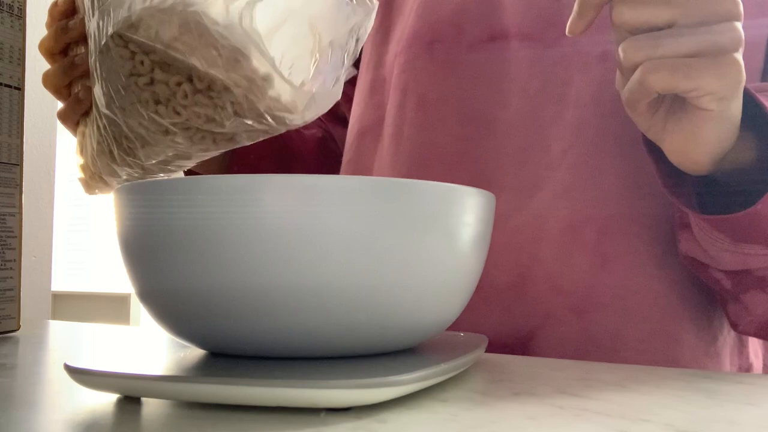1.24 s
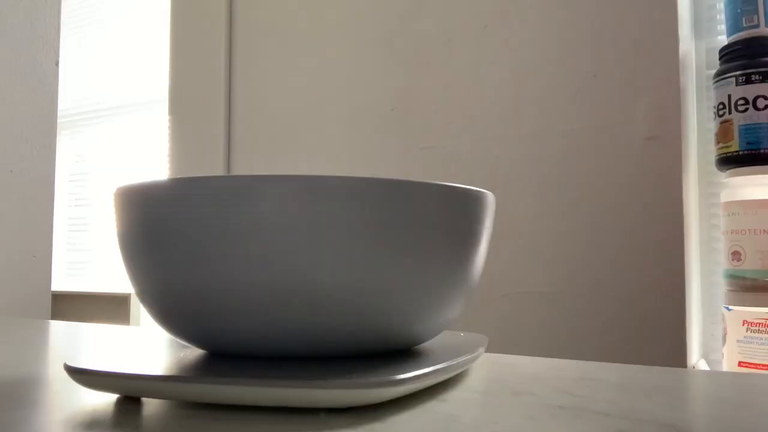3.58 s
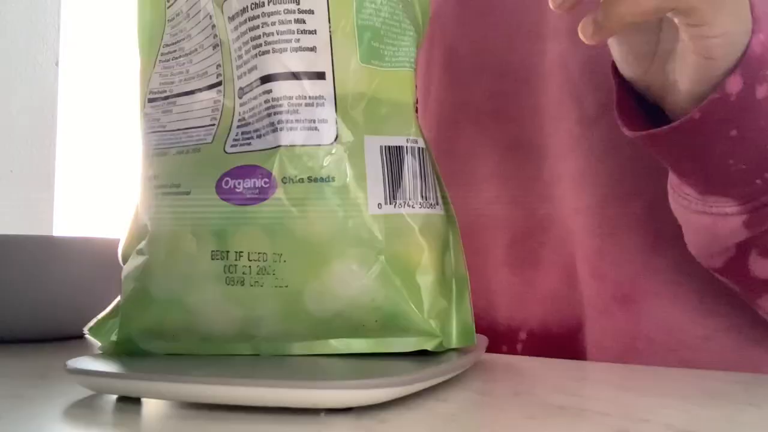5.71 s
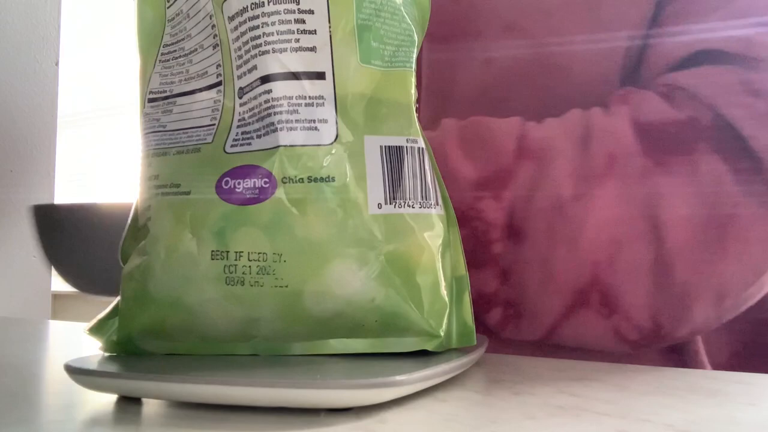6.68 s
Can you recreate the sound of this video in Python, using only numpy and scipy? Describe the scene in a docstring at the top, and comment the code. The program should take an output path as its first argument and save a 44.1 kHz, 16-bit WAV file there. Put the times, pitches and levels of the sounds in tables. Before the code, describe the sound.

Heard up close on the counter of a small, softly humming kitchen, a thin plastic liner crackles as cereal flakes slide out and rattle brightly into a bowl. When the pouring stops, a stiff pouch rustles and drops onto a scale with three dull knocks, then crinkles in sharp snaps that thin out. Near the end come a soft bump with a short scuff and a faint swish of a sleeve.

```python
"""Fingers tick on a thin plastic liner over the quiet hum of a small kitchen. Cereal slides out of it
and patters in gushes into a bowl on a kitchen scale. Then a stiff plastic pouch is picked up, dropped
on the scale with three thumps and crinkled by hand, its folds buckling in snaps. A soft bump, a scuff
and the brush of a sleeve follow. A close-set stereo pair stands right beside it all on the counter."""
import sys
import numpy as np
from scipy import signal
from scipy.fft import rfft, irfft, next_fast_len
from scipy.io import wavfile

SR = 44100
rng = np.random.default_rng(int(sys.argv[2]) if len(sys.argv) > 2 else 0)


def materialize(psi):
    """Save the field psi as 16-bit PCM at rate SR to the path in sys.argv[1].

    A 1-D psi becomes a single channel; in a 2-D psi each row is a channel.
    """
    bounded = np.clip(np.atleast_2d(psi).T, -1, 1)
    quanta = np.round(bounded * 32767).astype(np.int16)
    wavfile.write(sys.argv[1], SR, quanta)


N = 374401
TIME = np.arange(N) / SR
TAPS, LEAD = 4096, 256  # samples in a filter or snap; samples ahead of a snap's crack
HZ = np.maximum(np.fft.rfftfreq(TAPS, 1 / SR), 1)

# spectrum of a dry tick, from flake or liner: frequency_hz, level_db
TICK_COLOUR = [(300, -39.5), (1000, -5.5), (2000, -4.5), (5000, -4), (9000, 0), (16000, -5.5)]
# hollow of the bowl: pitch_hz, width_hz, boost_db
BOWL_RESONANCES = [(960, 130, 6), (1600, 170, 5), (2060, 260, 11), (2440, 70, 6), (3150, 260, 9.5),
                   (3420, 260, 12), (5640, 450, 6), (6700, 300, 5), (8540, 200, 5)]
# spectrum of the stiff pouch film: frequency_hz, level_db
POUCH_COLOUR = [(100, -9.5), (200, 1.5), (370, 4.5), (500, 11.5), (710, -4.5), (850, 5.5), (1200, 3),
                (1850, 4.5), (2600, -4.5), (3400, -1), (4500, -8), (6000, -13.5), (9000, -16.5),
                (16000, -22)]


def from_db(db):
    """Decibels to gain."""
    return 10 ** (np.asarray(db) / 20)


def pan(db):
    """Gains that put the left microphone db above the right."""
    return from_db([[db / 2], [-db / 2]])


def in_time(points):
    """A level curve as a gain at every sample, silent outside its span."""
    times, level_db = np.transpose(points)
    inside = np.clip(np.minimum(TIME - times[0], times[-1] - TIME) / .01, 0, 1)
    return from_db(np.interp(TIME, times, level_db)) * inside


def movement(start, length, db, attack_s, sag_db_per_s, release_db_per_s):
    """Gain of one movement: it swells, drifts while it lasts and then dies away."""
    age = np.maximum(TIME - start, 0)
    fall_db = sag_db_per_s * age + release_db_per_s * np.maximum(age - length, 0)
    return np.minimum(age / attack_s, 1) * from_db(db - np.minimum(fall_db, 100))


def at_hz(points, hz=HZ):
    """Read a table along a log-frequency axis."""
    frequencies, values = np.transpose(points)
    return np.interp(np.log(hz), np.log(frequencies), values)


def around(hz, skirt_db):
    """Broad hump: skirt_db down one octave from its centre."""
    return -skirt_db * np.log2(1 + np.log2(HZ / hz) ** 2)


def resonance(hz, width_hz, boost_db):
    """One narrow peak in a spectrum, in dB."""
    return boost_db / (1 + (2 * (HZ - hz) / width_hz) ** 2)


def boost(modes):
    """Several resonances together, in dB."""
    return sum(resonance(*mode) for mode in modes)


def treble_shelf(db, corner_hz=4200):
    """Raise or lower everything above the corner."""
    return db / (1 + (corner_hz / HZ) ** 4)


def coloured(x, shape_db):
    """Causal (minimum-phase) filter of unit energy with the given response."""
    cepstrum = irfft(shape_db * np.log(10) / 20)
    cepstrum[1:TAPS // 2] *= 2
    cepstrum[TAPS // 2 + 1:] = 0
    response = irfft(np.exp(rfft(cepstrum)))
    return signal.oaconvolve(x, response[None] / np.linalg.norm(response))[:, :x.shape[1]]


def add(out, start_s, sound):
    """Mix a short stereo sound in at start_s."""
    start = max(round(start_s * SR), 0)
    out[:, start:start + sound.shape[1]] += sound[:, :N - start]


def placed(x, lag_ms):
    """Two microphones; a positive lag reaches the left one later."""
    i, half = np.arange(len(x)), lag_ms * SR / 2000
    return np.array([np.interp(i - half, i, x), np.interp(i + half, i, x)])


def held(x, seconds):
    """Scale a short stereo sound to the energy of a full-scale level held for that long."""
    return x * np.sqrt(seconds * SR / (np.sum(x ** 2) / 2))


def dying(energy, decay_ms, rise_ms=0.099):
    """Amplitude of bursts whose energy builds up quickly and leaks away."""
    decay, rise = np.exp(-1000 / (np.array([decay_ms, rise_ms]) * SR))
    stored = signal.lfilter([(1 - decay) * (1 - rise)], [1, -decay - rise, decay * rise], energy + 1e-18)
    return np.sqrt(np.abs(stored))


def cracks(energy, crack_ms, scatter_ms, scatter_db, lag_ms):
    """Each impulse is a sharp direct crack, then a diffuse scatter from the surfaces close by."""
    white = rng.standard_normal((3, len(energy)))
    direct = placed(dying(energy, crack_ms) * white[0], lag_ms)
    scatter = from_db(scatter_db) * dying(energy, scatter_ms) * white[1:]
    return (direct + scatter) / np.hypot(1, from_db(scatter_db))


def grains(per_s, spread_db):
    """Energies of random tiny impacts, many weak and a few strong; mean 1."""
    energy = (rng.random(N) < per_s / SR) / per_s
    hits = np.flatnonzero(energy)
    energy[hits] *= from_db(spread_db * np.minimum(rng.exponential(1, N)[hits], 4)) ** 2
    return energy / energy.mean()


def buckling(before_db, after_db, fade_s):
    """Energy of one snap at sample LEAD: the material creaks before it and settles in smaller snaps."""
    age = (np.arange(TAPS) - LEAD) / SR
    small_snaps = (rng.random(TAPS) < 500 / SR) * rng.exponential(1, TAPS)
    fade = from_db(np.where(age < 0, before_db, after_db)) ** 2 * np.exp(-np.abs(age) / fade_s)
    return signal.unit_impulse(TAPS, LEAD) + small_snaps * fade


def tick(colour):
    """One small hard impact with the given spectrum."""
    energy = buckling(before_db=-25, after_db=-20, fade_s=.006)
    crack = cracks(energy, crack_ms=.34, scatter_ms=2, scatter_db=-8, lag_ms=.055)
    return held(coloured(crack, colour), seconds=.00065)


def diffuse(shape_db):
    """Noise from all around, most alike at the two microphones in the deep bass and high treble."""
    # likeness of left and right: frequency_hz, correlation
    likeness = [(60, 0.84), (150, 0.28), (380, 0.49), (950, -0.39), (2380, -0.033), (5980, 0.79),
                (15000, 0.98)]
    size = next_fast_len(N)
    alike = np.clip(at_hz(likeness, np.maximum(np.fft.rfftfreq(size, 1 / SR), 1)), -.98, .98)
    mid, side = rfft(rng.standard_normal((2, size)))
    pair = irfft(np.sqrt(1 + alike) * mid + np.sqrt(1 - alike) * side * [[1], [-1]])[:, :N]
    return coloured(pair / np.sqrt(2), shape_db)


def appliance_hum():
    """Room tone: the low steady rush of an appliance with a few faint tones and a thin whine."""
    # spectrum of the rush: frequency_hz, level_db
    rush_colour = [(30, -4), (65, -10), (90, -5), (130, 0), (290, -3.5), (420, -15), (500, -13), (660, -21),
                   (900, -24), (1500, -29), (2600, -44), (6000, -55.5), (10000, -54.5), (16000, -60)]
    # resonances in the rush: pitch_hz, width_hz, boost_db
    rush_modes = [(238, 14, 5), (470, 20, 3), (530, 25, 8), (720, 25, 6), (815, 40, 6), (10950, 300, 8)]
    # steady tones: pitch_hz, level_db
    hum_tones = [(118, -74), (140, -64), (178, -65), (236.9, -62.5), (274.5, -74.5), (527.6, -76.5),
                 (721, -92), (818, -79), (1303, -83.5)]
    tones = sum(from_db(db) * np.sqrt(2) * np.sin(2 * np.pi * (hz * TIME + rng.random()))
                for hz, db in hum_tones)
    rush = from_db(-52.5) * diffuse(at_hz(rush_colour) + boost(rush_modes))
    return (rush + tones) * pan(2.4)


def grip():
    """Faint ticks of the thin liner under the fingers before it tips."""
    # fingers shifting: time_s, level_db
    finger_levels = [(0.0, -64), (0.11, -73.5), (0.226, -62.5), (0.35, -79), (0.492, -62), (0.73, -114)]
    energy = grains(per_s=1600, spread_db=4.5) * in_time(finger_levels) ** 2
    ticks = cracks(energy, crack_ms=.74, scatter_ms=1.1, scatter_db=4, lag_ms=0)
    return from_db(6) * coloured(ticks, at_hz(TICK_COLOUR) + treble_shelf(-17.5))


def liner_snaps():
    """Folds of the liner flip over with a dry, pitched tick."""
    # folds flipping: start_s, level_db, pitch_hz, treble_db
    snaps = [(0.145, -45.5, 2280, -19), (0.225, -31.5, 3700, -5), (0.257, -33, 3500, -23),
             (0.3971, -33.5, 1970, -15), (0.479, -34.5, 2300, -27), (0.542, -46.5, 3230, -44),
             (0.6075, -38, 1670, -19.5), (0.7058, -49, 3070, -4.5), (0.8522, -31.5, 1960, -12),
             (0.912, -33, 1590, -27), (0.99, -30, 2100, -24), (1.184, -35, 1590, -6),
             (1.235, -36, 3450, -10), (1.39, -42, 3470, -19), (1.5942, -22.5, 1600, -7),
             (2.597, -21, 2180, -25)]
    out, mean_treble_db = np.zeros((2, N)), np.mean(snaps, axis=0)[-1]
    for start_s, level_db, hz, treble_db in snaps:
        fold = around(hz, skirt_db=5) + resonance(hz, width_hz=320, boost_db=12)
        colour = at_hz(TICK_COLOUR) + fold + treble_shelf(7 + treble_db - mean_treble_db)
        add(out, start_s - LEAD / SR, from_db(level_db) * tick(colour))
    return out


def handling():
    """Dull rumble of hands and sleeves shifting the load."""
    # hand movements: start_s, length_s, level_db
    moves = [(0.376, 0.65, -47.5), (1.334, 2.24, -50), (3.624, 0.25, -45), (4.431, 0.67, -45.5)]
    # spectrum of the rumble: frequency_hz, level_db
    rumble_colour = [(35, -51.5), (60, -21), (140, 5), (204, 4), (237, 1.5), (265, -17), (293, -1),
                     (407, -18.5), (477, -7), (650, -12), (840, -61.5), (1430, -120)]
    effort = sum(movement(*move, attack_s=.046, sag_db_per_s=2, release_db_per_s=48) for move in moves)
    return effort * diffuse(at_hz(rumble_colour))


def cereal_slide():
    """Flakes slide down the tipped liner in a stream of tiny contacts."""
    # flow over the film: time_s, level_db
    slide_levels = [(0.715, -63), (0.76, -51), (0.842, -51), (0.865, -45.5), (0.99, -43), (1.12, -49),
                    (1.26, -50), (1.38, -45), (1.5, -46), (1.72, -46.5), (1.79, -44.5), (2.19, -45.5),
                    (2.57, -60.5), (2.7, -48.5), (3.07, -43.5), (3.47, -59), (3.57, -61.5)]
    # spectrum of flakes on film: frequency_hz, level_db
    slide_colour = [(150, -45), (250, -24), (360, 0), (410, -6), (475, 3.5), (650, -7.5), (875, 1),
                    (1380, -3.5), (1610, 2.5), (2130, -2.5), (2440, -6), (3100, -7), (3430, -1), (3700, -5),
                    (4190, -9.5), (14200, -20), (16000, -35)]
    energy = grains(per_s=1200, spread_db=3.4) * in_time(slide_levels) ** 2
    contacts = cracks(energy, crack_ms=.5, scatter_ms=3.5, scatter_db=1, lag_ms=0)
    return from_db(2.5) * coloured(contacts, at_hz(slide_colour))


def cereal_gushes():
    """Flakes spill in gushes and patter into the bowl while the emptying liner crackles."""
    # spills over the lip: start_s, length_s, patter_db, sag_db_per_s, crackle_db
    gushes = [(0.68, 0.97, -65, -9, -68.5), (1.79, 0.58, -31.5, 9.5, -40), (2.422, 0.063, -36.5, 26, -65),
              (2.615, 0.782, -41.5, 2, -52), (3.502, 0.1, -62, 8, -63)]
    # flakes from big to small: pitch_hz, share_db
    flake_sizes = [(1600, -8.5), (3800, -6), (9000, -6)]
    # spectrum of the patter in the bowl: frequency_hz, level_db
    bowl_colour = [(400, -42), (900, -3.5), (1600, -5.5), (2200, -3), (2700, -5.5), (4300, -6), (6000, -1),
                   (9000, -3.5), (16000, -16.5)]
    # spectrum of the thin liner: frequency_hz, level_db
    liner_colour = [(1500, -31), (4000, -8), (7000, -2), (11000, -1.5), (16000, -5.5)]
    landing = crackle = patter = 0
    for start_s, length_s, patter_db, sag, crackle_db in gushes:
        flow = movement(start_s, length_s, db=0, attack_s=.09, sag_db_per_s=sag, release_db_per_s=193)
        landing += from_db(patter_db) * flow
        crackle += from_db(crackle_db) * flow
    flakes_per_s = 950 * np.maximum(landing / landing.max(), .4)  # a thin flow has fewer flakes
    for hz, share_db in flake_sizes:
        energy = grains(flakes_per_s / len(flake_sizes), spread_db=3.3) * landing ** 2
        hits = cracks(energy, crack_ms=.3, scatter_ms=2, scatter_db=-2.5, lag_ms=.04)
        colour = at_hz(bowl_colour) + boost(BOWL_RESONANCES) + around(hz, skirt_db=4.5)
        patter += from_db(share_db) * coloured(hits, colour)
    film_energy = grains(per_s=450, spread_db=5.2) * crackle ** 2
    film = cracks(film_energy, crack_ms=.15, scatter_ms=3, scatter_db=0, lag_ms=.06)
    return from_db(4.5) * patter + from_db(9.5) * coloured(film, at_hz(liner_colour))


def hard_flakes():
    """The hardest impacts stand out, each with its own pitch and its own mix of the bowl's modes."""
    # flakes hitting the bowl: start_s, level_db, pitch_hz, treble_db
    impacts = [(1.7525, -19.5, 3120, -18.5), (1.7615, -10, 6200, -20.5), (1.784, -11, 5900, -24),
               (1.801, -15, 2170, -21), (1.8045, -11.5, 3360, -17.5), (1.86, -27, 5700, -16),
               (1.877, -18, 3270, -18), (1.9, -19, 3240, -22.5), (1.9121, -9, 5700, -10),
               (1.819, -8, 3380, -16.5), (1.839, -12, 8730, -7), (1.8692, -7.5, 3700, -17),
               (1.889, -15, 3440, -10), (1.9096, -9.5, 5600, -10.5), (1.917, -19, 6660, -12.5),
               (1.9474, -9, 3470, -10), (1.981, -13, 3430, -11), (1.987, -7, 3374, -14),
               (2.0039, -11, 2070, -14.5), (2.0583, -17, 3100, -23), (2.07, -12, 3270, -18.5),
               (2.0773, -9.5, 3130, -27.5), (2.1078, -17, 3450, -13.5), (2.127, -13.5, 3370, -15),
               (2.1709, -10, 3400, -13.5), (2.186, -13.5, 3260, -14), (2.2193, -14, 3360, -20.5),
               (2.3461, -24, 3170, -24.5), (2.367, -17, 3570, -23), (2.417, -26, 5660, -15.5),
               (2.4453, -23, 3230, -10.5), (2.4754, -17.5, 3500, -10.5), (2.4944, -20, 3450, -19),
               (2.5223, -22.5, 2020, -15), (2.5553, -24.5, 2000, -15), (2.617, -25.5, 1930, -27.5),
               (2.6248, -29, 3360, -21), (2.6444, -31, 5620, -15.5), (2.7026, -31, 3100, -25.5),
               (2.7072, -19, 3070, -23.5), (2.7511, -17.5, 6660, -15), (2.8268, -29, 2060, -18.5),
               (2.843, -23, 1570, -15), (2.8696, -21.5, 2100, -27.5), (2.933, -30, 3230, -30),
               (2.952, -32, 1770, -16), (3.025, -24, 3490, -6), (3.047, -16, 3100, -5.5),
               (3.11, -19, 2100, -3.5), (3.1276, -14.5, 8700, -16.5), (3.1613, -24, 3440, -11),
               (3.2422, -20, 1960, -14), (3.2647, -22, 2050, -1.5), (3.3056, -16.5, 6550, -7.5),
               (3.362, -29, 3330, -16.5), (3.371, -23, 3390, -6), (3.3978, -27, 6700, -15),
               (3.4187, -30, 6600, -18.5), (3.468, -24.5, 2060, -19.5), (3.493, -27, 8650, -14),
               (3.5384, -30, 2100, -24.5)]
    out, mean_treble_db = np.zeros((2, N)), np.mean(impacts, axis=0)[-1]
    for start_s, level_db, hz, treble_db in impacts:
        bowl = .65 * sum(rng.uniform(.5, 1.5) * resonance(*mode) for mode in BOWL_RESONANCES)
        flake = around(hz, skirt_db=3.5) + resonance(hz, width_hz=260, boost_db=5.5)
        colour = at_hz(TICK_COLOUR) + bowl + flake + treble_shelf(11.5 + treble_db - mean_treble_db)
        add(out, start_s - LEAD / SR, from_db(level_db) * tick(colour))
    return out


def pouch():
    """Each squeeze rubs and crackles the pouch; after each crease the contents settle in a fine rustle."""
    # the hand squeezing: start_s, length_s, level_db
    squeezes = [(3.572, 0.22, -56.5), (3.993, 0.017, -44.5), (4.481, 0.5, -49), (4.657, 0.23, -36.5),
                (5.004, 0.081, -32.5), (5.168, 0.063, -56), (5.621, 0.077, -56), (6.069, 0.16, -71.5),
                (6.3, 0.24, -64)]
    # creases snapping over: start_s, level_db, pitch_hz, treble_db
    folds = [(3.643, -31, 1490, -32.5), (3.684, -21.5, 1310, -8.5), (3.687, -19, 1810, -19.5),
             (3.702, -23.5, 1940, -3.5), (3.741, -17.5, 1880, -23), (3.753, -21, 937, -4),
             (3.769, -15.5, 1250, -10.5), (4.274, -11.5, 2160, -22.5), (4.305, -15.5, 3110, -19),
             (4.371, -18, 960, -21), (4.387, -18.5, 674, -14), (4.494, -22, 1600, -22.5),
             (4.508, -28.5, 1480, -32.5), (4.5235, -39, 1290, -39), (4.549, -18.5, 1040, -20),
             (4.576, -22.5, 1610, -20.5), (4.602, -25.5, 1810, 2.5), (4.679, -10, 1440, -11),
             (4.686, -12, 1500, -24), (4.6919, -13.5, 1300, -12.5), (4.698, -17.5, 1800, 3.5),
             (4.723, -16, 1800, -9.5), (4.756, -13, 3520, -20.5), (4.769, -19.5, 1570, -7),
             (4.789, -17, 1640, 0.5), (4.806, -30, 1100, -27.5), (4.811, -32, 1580, -4),
             (4.84, -16.5, 1460, -13), (4.852, -13, 2100, -13.5), (4.891, -18.5, 2180, -16),
             (4.9369, -14.5, 880, -23), (4.96, -28, 1760, -16.5), (4.9704, -33, 1250, -21.5),
             (4.9804, -34, 1250, -27), (5.01, -18.5, 1590, -29), (5.025, -19, 950, -8),
             (5.034, -19, 1820, -15.5), (5.051, -16.5, 1570, -16.5), (5.074, -21.5, 953, -10),
             (5.094, -19, 1250, -11.5), (5.108, -33.5, 3230, -27), (5.1311, -32, 1570, -28),
             (5.146, -15.5, 2420, -31.5), (5.178, -23, 1610, -18), (5.198, -24, 1300, -15),
             (5.2408, -20.5, 1510, -30), (5.261, -40, 1540, -11.5), (5.275, -26, 1570, -22.5),
             (5.3116, -37, 930, -37.5), (5.341, -30, 1900, -33.5), (5.381, -34, 1190, -35.5),
             (5.406, -22.5, 1750, -37), (5.519, -40, 824, -38), (5.618, -30, 1310, -35),
             (5.641, -21, 940, -21.5), (5.665, -22, 2260, -23.5), (5.673, -24.5, 1010, -13),
             (5.74, -30.5, 820, -42.5), (5.77, -32, 3200, -17.5), (6.318, -41, 1300, -27.5),
             (6.404, -34.5, 1300, -22.5), (6.796, -65, 4510, -3)]
    # spectrum of the hand rubbing the film: frequency_hz, level_db
    rub_colour = [(120, -11.5), (200, 9.5), (316, -25.5), (473, -6.5), (709, -11), (851, -40), (1590, 1),
                  (2510, -4.5), (3370, -7.5), (12800, -15.5), (16000, -15)]
    rustle = sum(movement(*row, attack_s=.02, sag_db_per_s=5, release_db_per_s=230) for row in squeezes)
    rub_energy = grains(per_s=850, spread_db=4.2) * rustle ** 2
    rub = cracks(rub_energy, crack_ms=.5, scatter_ms=2.5, scatter_db=0, lag_ms=.1)
    settle_db, settle_s = -12, .016
    jolts = np.zeros(N)
    for start_s, level_db, _, treble_db in folds:
        jolts[round(start_s * SR)] = from_db(level_db + treble_db + settle_db) ** 2
    settling = signal.lfilter([1], [1, -np.exp(-1 / (settle_s * SR))], jolts + 1e-18)
    crackle_energy = grains(per_s=1000, spread_db=4) * (settling + (from_db(-3.5) * rustle) ** 2)
    crackle = cracks(crackle_energy, crack_ms=.25, scatter_ms=2, scatter_db=-2, lag_ms=.07)
    return (creases(folds) + from_db(-7.5) * coloured(rub, at_hz(rub_colour))
            + from_db(.5) * coloured(crackle, at_hz(POUCH_COLOUR) + treble_shelf(7.8)))


def creases(folds):
    """The stiff pouch film buckles in separate snaps, each ringing briefly at the pitch of its fold."""
    out, mean_treble_db = np.zeros((2, N)), np.mean(folds, axis=0)[-1]
    for start_s, level_db, hz, treble_db in folds:
        energy = buckling(before_db=-20, after_db=-16, fade_s=.007)
        snap = cracks(energy, crack_ms=.7, scatter_ms=3, scatter_db=-4, lag_ms=.313 * rng.normal(1, .3))
        fold = around(hz, skirt_db=3) + resonance(hz, width_hz=300, boost_db=8.5)
        colour = at_hz(POUCH_COLOUR) + fold + treble_shelf(14 + treble_db - mean_treble_db)
        gain = from_db(level_db) * pan(rng.normal(0, 3.5))
        add(out, start_s - LEAD / SR, gain * held(coloured(snap, colour), seconds=.001))
    return out


def thumps():
    """The soft, heavy pouch lands with a dead thud and sets scale and counter ringing briefly."""
    # blows on scale and counter: start_s, thud_db, thud_hz, ring_db
    blows = [(3.766, -28.5, 200, -57), (4.028, -32, 140, -56), (4.277, -12, 193, -13.5),
             (4.306, -15.5, 280, -19), (4.374, -14.5, 168, -19.5), (4.68, -29.5, 200, -34),
             (5.005, -54, 200, -28.5), (6.407, -30.5, 146, -43.5), (6.498, -29.5, 165, -39.5)]
    # modes of scale and counter: pitch_hz, level_db, t60_s
    scale_modes = [(100.3, -22, 0.085), (126, -6, 0.11), (202, -2.5, 0.09), (319, -13, 0.059),
                   (356, -6.5, 0.11), (469, -7, 0.1), (755, 6.5, 0.022), (954, -7, 0.1), (1235, -7, 0.083),
                   (1276, -20, 0.083)]
    out, age = np.zeros((2, N)), np.arange(4 * TAPS) / SR
    swell_cycles = 1.05  # until the cushion of cereal pushes hardest
    onset = 1 - np.exp(-age / .00042)  # the contents arrive a moment after the film
    for start_s, thud_db, thud_hz, ring_db in blows:
        swell = age * thud_hz / swell_cycles
        thud = (swell * np.exp(1 - swell)) ** 3 * np.sin(2 * np.pi * thud_hz * age)
        ring = 0
        for hz, db, t60_s in scale_modes:
            decay = from_db(db + rng.normal(0, 3) - 60 * age / t60_s)
            ring += decay * np.sin(2 * np.pi * (hz * rng.normal(1, .025) * age + rng.random()))
        add(out, start_s, from_db(thud_db) * placed(thud, lag_ms=.5))
        add(out, start_s, from_db(ring_db) * placed(ring * onset, lag_ms=.51))
    return out * pan(2)


def scuff():
    """Dense little slips swell and stop as something hollow is shoved over the counter."""
    # the shove: centre_s, half_length_s, level_db
    shoves = [(6.485, 0.015, -37)]
    # spectrum of the slips: frequency_hz, level_db
    scuff_colour = [(59, -26), (100, -6), (229, -6), (283, -13), (350, -7), (621, -18), (818, -14),
                    (1080, -31), (1170, -27), (1650, -21), (2800, -24), (3120, -21), (4980, -38),
                    (6420, -28), (10000, -44), (16000, -38)]
    # resonances of the hollow thing: pitch_hz, width_hz, boost_db
    hollow_modes = [(790, 190, 9), (1715, 66, 5.4), (3430, 460, 4.3)]
    force = sum(from_db(db) * np.exp(-.5 * ((TIME - s) / half) ** 2) for s, half, db in shoves)
    energy = grains(per_s=600, spread_db=2.5) * force ** 2
    slips = cracks(energy, crack_ms=.89, scatter_ms=6, scatter_db=2, lag_ms=.2)
    return coloured(slips, at_hz(scuff_colour) + boost(hollow_modes))


def sleeve():
    """A sleeve slides over the counter: countless fibres catch and slip in a fine, bright hiss."""
    # the stroke of the sleeve: time_s, level_db
    brush_levels = [(7.57, -74.5), (7.645, -72), (7.68, -64), (7.735, -55), (7.825, -60), (7.854, -50.5),
                    (7.915, -58), (7.976, -60.5), (8.003, -55), (8.054, -61.5), (8.194, -66), (8.31, -85.5)]
    # spectrum of the cloth: frequency_hz, level_db
    cloth_colour = [(500, -17), (1000, -8.5), (1600, 4.5), (2050, 1.5), (2650, -8.5), (3300, -0.5),
                    (4200, -4.5), (5600, -5), (6800, 2), (12000, -1), (16000, -3.5)]
    energy = grains(per_s=3000, spread_db=2.5) * in_time(brush_levels) ** 2
    fibres = cracks(energy, crack_ms=.4, scatter_ms=3, scatter_db=8, lag_ms=0)
    return coloured(fibres, at_hz(cloth_colour)) * pan(-1.4)


def kitchen_reverb(x):
    """Dense reflections of a small room; the treble dies first."""
    # decay of the room: frequency_hz, t60_s
    decay_times = [(150, .28), (600, 0.12), (2500, 0.13), (7000, 0.11), (15000, 0.06)]
    age, edges_hz = np.arange(SR // 2) / SR, np.geomspace(80, 17000, 9)
    tail = 0
    for low, high in zip(edges_hz, edges_hz[1:]):
        band_pass = signal.butter(2, [low, high], "band", fs=SR, output="sos")
        band = signal.sosfilt(band_pass, rng.standard_normal((2, len(age))))
        tail += band * 1000 ** (-age / at_hz(decay_times, np.sqrt(low * high)))
    tail *= np.clip(age / .004, 0, 1)
    return signal.oaconvolve(x, tail / np.linalg.norm(tail, axis=1, keepdims=True), axes=1)[:, :N]


def scene():
    """Pour and pouch are close up on the counter, a little to the right, with the room behind them."""
    pour = grip() + liner_snaps() + cereal_slide() + cereal_gushes() + hard_flakes()
    near = pour * pan(-1.2) + pouch() * pan(-1.5) + thumps() + scuff() + sleeve()
    return near + from_db(-11.5) * kitchen_reverb(near) + handling() + appliance_hum()


def record(dry):
    """Close-set microphones: narrow thin bass, wide mids, top cut. The level dips briefly twice."""
    # stereo width of the pair: frequency_hz, side_db
    side_levels = [(60, -6), (140, -7.5), (300, -4), (550, -1), (1100, 5), (2200, 1), (16000, -1.5)]
    # dips in level: centre_s, half_length_s, depth_db
    dips = [(3.578, 0.014, -18), (5.795, 0.016, -28)]
    size = next_fast_len(N + TAPS)
    width = from_db(at_hz(side_levels, np.maximum(np.fft.rfftfreq(size, 1 / SR), 1)))
    side = irfft(rfft((dry[0] - dry[1]) / 2, size) * width, size)[:N]
    low_cut = signal.butter(4, 105, "high", fs=SR, output="sos")
    top_cut = signal.ellip(10, .1, 80, 16000, fs=SR, output="sos")
    pair = signal.sosfilt(low_cut, dry.mean(axis=0) + side * [[1], [-1]])
    dip_db = sum(db * np.exp(-np.minimum(np.abs(TIME - s) / half, 4) ** 4) for s, half, db in dips)
    return signal.sosfilt(top_cut, pair * from_db(dip_db))


dry = scene()
out = record(dry)
materialize(out)
```